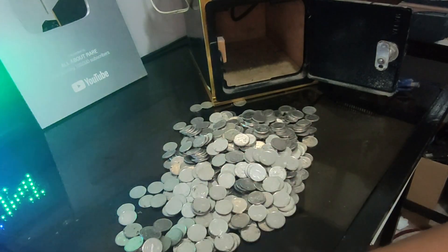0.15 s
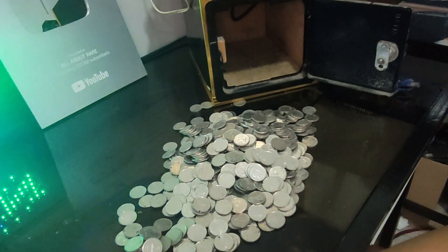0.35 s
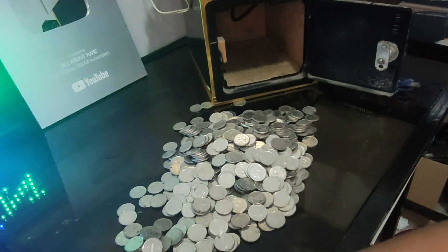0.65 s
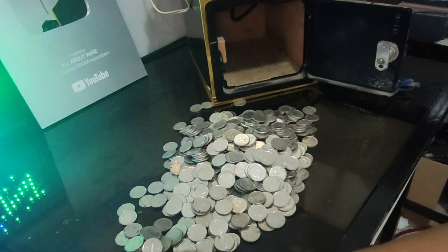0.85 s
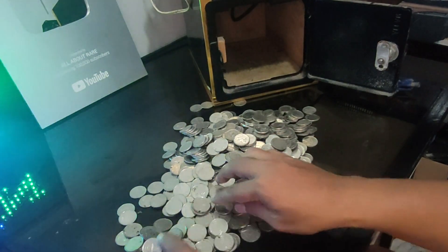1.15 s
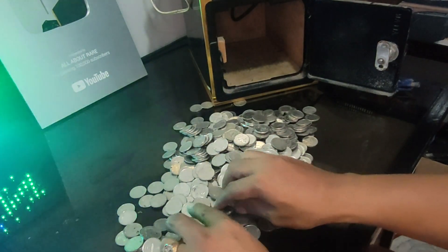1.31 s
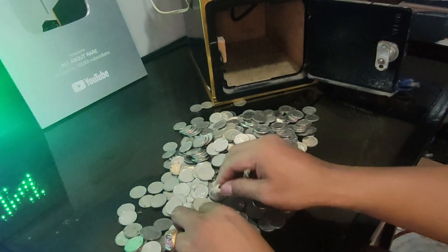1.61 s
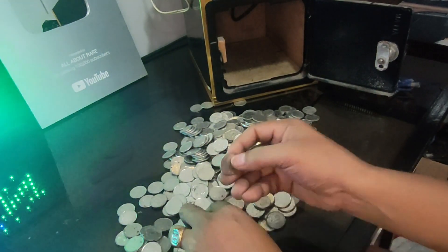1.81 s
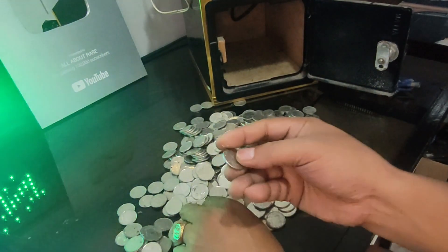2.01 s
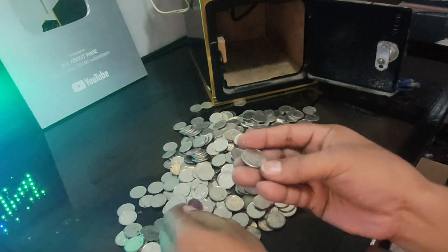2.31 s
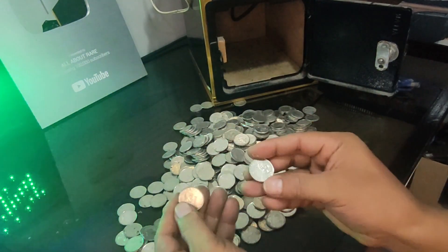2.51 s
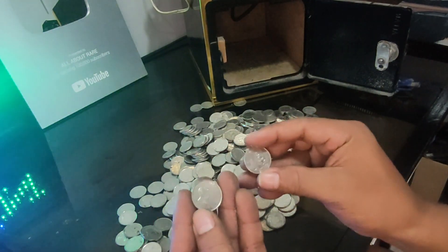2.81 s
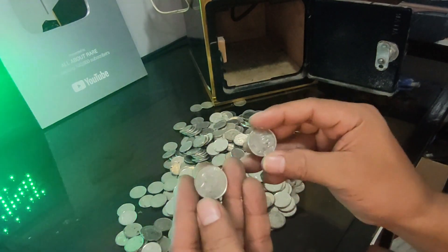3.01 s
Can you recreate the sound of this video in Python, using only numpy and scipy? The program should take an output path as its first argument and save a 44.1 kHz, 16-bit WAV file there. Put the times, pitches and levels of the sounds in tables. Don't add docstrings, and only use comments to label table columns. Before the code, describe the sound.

Coins are stirred on a hard table, close up in a small live room over a soft fan hum. A sharp knock comes at 0.37 s, a lighter one at 0.65, then a hard clack with ringing around 0.92. From 1.4 s scrapes and clinks grow busier, with strong knocks near 1.95 and faint thuds. Small damped pings tap at 2.3-2.5 s; low draught buffets the right from 2.85.

```python
import sys
import numpy as np
from scipy import signal
from scipy.fft import rfft, irfft
from scipy.io import wavfile
from scipy.ndimage import uniform_filter1d

SR = 44100
rng = np.random.default_rng(int(sys.argv[2]) if len(sys.argv) > 2 else 0)


def store_wav(level_fs):
    pcm = np.round(np.clip(np.atleast_2d(level_fs), -1, 1) * 32767)
    wavfile.write(sys.argv[1], SR, pcm.T.astype(np.int16))


def nominal_scale(level):
    x = np.asarray(level, float) / 20
    return 10 ** x


N = 138915
T = np.arange(N) / SR
F = np.maximum(np.fft.rfftfreq(N, 1 / SR), 1)

# frequency in Hz, level in dB per Hz.
HEAP_COLOUR = [(80, -31), (350, -8), (800, -3), (2000, 1.5), (4200, -1), (6000, -3.5), (7500, -11.5),
               (10000, -16), (15000, -22)]


def curve(table):
    table = np.array(table, float)
    return np.interp(np.log(F), np.log(table[:, 0]), table[:, 1])


def humps(table):
    return sum(db * np.exp(-.5 * ((F - hz) / (width / 2)) ** 2) for hz, width, db in table)


def colour(x, gain):
    return irfft(rfft(x, N) * gain, N)


def unit(x):
    return x / np.sqrt(np.mean(x ** 2))


def decay(t, t60):
    return np.exp(-np.log(1000) * t / t60)


def ring(hz, t60):
    t = T[:int(.4 * SR)]
    return np.sin(2 * np.pi * hz * t) * decay(t, t60)


def soft_start(tone, rise_s):
    return tone * np.minimum(T[:len(tone)] / rise_s, 1)


def add(out, start_s, x, pan_db):
    i = int(start_s * SR)
    x = x[..., :N - i]
    out[:, i:i + x.shape[-1]] += x * nominal_scale(np.array([[pan_db], [-pan_db]]) / 2)


def pair(n):
    shared = 0.36
    a = rng.standard_normal((3, n))
    return np.sqrt(shared) * a[0] + np.sqrt(1 - shared) * a[1:]


def fan():
    # frequency in Hz, level in dB per Hz.
    fan_colour = [(24, -52), (40, -28), (155, -3.5), (631, -6), (712, -7.5), (1080, -0.5), (1340, -4.5),
                  (4070, -11), (13000, -54.5)]
    # frequency in Hz, width in Hz, lift in dB.
    fan_hums = [(154.5, 29, 6), (224, 56, 6), (1010, 40, 1.5)]
    # frequency in Hz, likeness from 0 to 1.
    port_likeness = [(60, 0.57), (130, 1), (300, 0.97), (640, 0.68), (1400, 0.11), (15000, .05)]
    level_db = -38.5
    like = curve(port_likeness)
    gain = nominal_scale(curve(fan_colour) + humps(fan_hums))
    mid = colour(rng.standard_normal(N), gain * np.sqrt(1 + like))
    side = colour(rng.standard_normal(N), gain * np.sqrt(1 - like))
    flutter_db = 0.87 * unit(uniform_filter1d(rng.standard_normal((2, N)), 4000))
    return nominal_scale(level_db) * unit(np.array([mid + side, mid - side]) * nominal_scale(flutter_db))


def draught():
    # start in seconds, peak in dB, pitch in Hz, length in seconds.
    puffs = [(0.114, -31.5, 35, 0.034), (0.237, -36.5, 35, 0.076), (0.378, -36, 40, .06),
             (2.703, -36.5, 45, 0.04), (2.751, -35, 45, 0.035), (2.839, -21.5, 70, 0.024),
             (2.867, -19.5, 80, 0.047), (2.9, -9.5, 90.6, 0.039), (2.928, -9, 65.3, 0.033),
             (2.964, -9, 187, 0.04), (2.972, -14, 70.4, 0.044), (3.021, -10, 79, 0.022),
             (3.039, -10, 188, 0.021), (3.043, -11.5, 55, 0.033), (3.06, -26, 35, .08),
             (2.906, -19.5, 300, 0.016), (3.025, -24, 350, .012)]
    sharp_db, leak_db = -20, -48
    rumble_hz, rumble_db = 35, -60.5
    out = np.zeros((2, N))
    t = T[:8192]
    for start_s, db, hz, length_s in puffs:
        noise = rng.standard_normal(8192)
        slow = unit(colour(noise, 1 / (1 + (1.6 * (F / hz - hz / F)) ** 2))[:8192])
        edge = unit(colour(noise, (F / hz) / (1 + (F / (3 * hz)) ** 4))[:8192])
        swell = np.sin(np.pi * np.clip(t / length_s, 0, 1)) ** 2
        puff = (slow + nominal_scale(sharp_db) * edge) * swell
        add(out, start_s, nominal_scale(db) * puff / np.abs(puff).max(), 0)
    rumble = unit(colour(rng.standard_normal(N), 1 / (1 + (F / rumble_hz) ** 4)))
    out = out + nominal_scale(rumble_db) * rumble
    return out * np.array([[nominal_scale(leak_db)], [1]])


def coin():
    # mode frequency in Hz, level in dB, t60 in seconds.
    coin_modes = [(6140, -3, .06), (6940, -11, 0.098), (9450, -18, 0.045), (10500, -9, .04),
                  (12900, -18, .08), (13400, 1, 0.086), (13400, -10, 0.12), (13700, -5, 0.065),
                  (14200, -16, .05)]
    body = 0
    for (hz, db, t60), (strike, tuning) in zip(coin_modes, rng.standard_normal((len(coin_modes), 2))):
        body = body + nominal_scale(db + 2.5 * strike) * ring(hz * (1 + 0.0044 * tuning), t60)
    return body


def slides():
    # start in seconds, length in seconds, level in dB, brightness in dB per octave, high ring in dB.
    slide_events = [(0.363, 0.076, -35, 0.5, -38), (.79, 0.17, -40.5, -0.5, -5), (0.926, 0.11, -41, 2, 1),
                    (0.979, 0.055, -36.5, -2, -3), (1.362, .1, -32, -0.5, -7), (1.471, 0.063, -36, -1, -17),
                    (1.57, 0.087, -29, -1, -6), (1.761, 0.087, -36.5, 1, -10), (1.798, 0.026, -33, -6, -10),
                    (2.1, 0.073, -40, -6, -15), (1.828, 0.081, -30.5, 1.5, -24),
                    (1.95, 0.091, -33.5, -0.5, -26), (2.03, 0.083, -33, 0.5, -19),
                    (2.208, 0.09, -30.5, 0.5, -14), (2.309, 0.15, -35, -0.5, 1),
                    (2.456, 0.091, -33, 3.5, -8), (2.571, 0.12, -34, 1, -4), (2.679, 0.056, -35.5, -2, -27)]
    rise = 0.24
    grains_per_s, grain_spread_db, grain_top_db, patchy_db = 4000, 5, 4, 3
    ragged_db, ring_level_db = 5, -18
    lead = 256
    out = np.zeros((2, N))
    for start_s, length_s, db, tilt_db, ring_db in slide_events:
        chance, size = rng.random((2, 8192))
        x = T[:8192] / length_s
        swell = np.clip(np.minimum(x / rise, (1 - x) / (1 - rise)), 0, 1)
        patches = unit(uniform_filter1d(rng.standard_normal(8192), size=200))
        swell = swell * nominal_scale(patchy_db * patches)
        size_db = np.minimum(-grain_spread_db * np.log(size + 1e-9), grain_top_db)
        clicks = (chance < grains_per_s / SR) * np.tanh(pair(8192))
        grains = unit(clicks * nominal_scale(size_db)) * swell
        ragged = np.interp(F / 200, np.arange(128), rng.standard_normal(128)) * np.clip(F / 4000, 0, 1)
        tilt = tilt_db * np.log2(np.maximum(F, 300) / 3000)
        gain = nominal_scale(curve(HEAP_COLOUR) + tilt + ragged_db * ragged)
        scrape = colour(grains, gain / np.sqrt(np.mean(gain ** 2)))
        scrape = np.roll(scrape, lead, axis=1)[:, :16384]
        body = coin()
        rung = signal.fftconvolve(grains, body[None] / np.sqrt(np.sum(body ** 2)))
        add(out, start_s - lead / SR, nominal_scale(db) * scrape, 1)
        add(out, start_s, nominal_scale(db + ring_db + ring_level_db) * rung, 2)
    return out


def knocks():
    # start in seconds, peak in dB, pitch in Hz, t60 in seconds, left over right in dB.
    knock_events = [(.3648, -10.5, 4170, 0.013, 1), (0.3662, -16.5, 2930, 0.026, 3.5),
                    (0.3676, -20, 1300, .015, 2), (0.3703, -22.5, 2040, 0.018, 3),
                    (.3785, -24.5, 3800, 0.014, 5), (0.6552, -22, 4460, 0.015, 5),
                    (0.805, -26, 3400, 0.023, 9), (0.8599, -28, 2760, .02, 2),
                    (.9230, -8.5, 4770, 0.016, -1), (0.9257, -21.5, 990, .015, 2),
                    (.934, -22.5, 5350, .04, 0), (.95, -26, 4400, 0.031, 6), (0.9774, -19, 2820, 0.021, -1),
                    (.9785, -20, 5050, .02, -2), (.9790, -28.5, 9400, 0.012, 6),
                    (1.012, -20, 1970, 0.021, -4), (1.376, -29, 3620, 0.027, 7), (1.392, -23, 4000, .03, 3),
                    (1.5185, -27.5, 4160, 0.019, 5), (1.5836, -19, 2040, 0.028, 6),
                    (1.587, -22.5, 4000, .02, 7), (1.7693, -26.5, 4070, .03, -5),
                    (1.836, -21, 2360, 0.033, 8), (1.853, -23, 5530, .015, 1),
                    (1.955, -11, 4600, 0.0046, -1), (1.9579, -9.5, 3920, 0.0064, 6),
                    (2.025, -12, 2460, 0.021, 4), (2.0257, -17.5, 4480, 0.029, -1),
                    (2.030, -20.5, 2240, .02, 2), (2.2110, -19, 2730, 0.028, -1),
                    (2.2123, -19.5, 5500, 0.015, 10.5), (2.2473, -29, 4280, 0.024, -1),
                    (2.4885, -13, 2860, 0.01, 7), (2.4900, -17.5, 1990, 0.039, 9.5),
                    (2.6927, -24.5, 3700, .025, 8.5)]
    rise_s, width, tick_db = 0.00035, 0.32, -8.5
    out = np.zeros((2, N))
    t = T[:4096]
    f = np.fft.rfftfreq(4096, 1 / SR) + 1
    bins = (f / SR * N).astype(int).clip(0, len(F) - 1)
    tick = nominal_scale(curve(HEAP_COLOUR) + tick_db)[bins]
    for start_s, db, hz, t60, pan_db in knock_events:
        gain = 1 / (1 + ((f / hz - hz / f) / width) ** 2) + tick
        burst = irfft(rfft(pair(4096)) * gain)
        burst = burst * (1 - np.exp(-t / rise_s)) * decay(t, t60)
        add(out, start_s, nominal_scale(db) * burst / np.abs(burst.mean(axis=0)).max(), pan_db)
    return out


def clinks():
    # start in seconds, peak in dB, pitch in Hz, t60 in seconds.
    clink_events = [(0.3661, -53, 13000, 0.064), (0.6549, -54, 14300, 0.07), (0.8066, -45, 13800, 0.07),
                    (0.843, -39.5, 13150, 0.07), (0.8599, -43, 13600, 0.07), (0.9228, -31, 13400, 0.07),
                    (0.9782, -29, 14200, 0.07), (0.986, -31, 13300, 0.083), (1.3748, -44, 13100, 0.07),
                    (1.49, -51, 13400, 0.07), (1.5185, -41, 12900, 0.07), (1.5725, -36, 12900, 0.07),
                    (1.7699, -51.5, 13500, 0.07), (1.8204, -34, 12970, 0.07), (1.8357, -25.5, 12920, 0.06),
                    (1.954, -30, 13900, 0.07), (2.0274, -31.5, 13120, 0.07), (2.1919, -31.5, 13170, 0.033),
                    (2.214, -31.5, 13200, 0.066), (2.3486, -48, 13700, 0.07), (2.376, -38, 13300, 0.088),
                    (2.4189, -36.5, 12800, 0.07), (2.4777, -30, 12900, 0.055), (2.5895, -44, 14000, 0.09),
                    (2.605, -38, 13500, 0.07), (2.6938, -43, 13400, 0.086)]
    spread, lag_s = .018, .000024
    out = np.zeros((2, N))
    for start_s, db, hz, t60 in clink_events:
        neighbours = sum(ring(hz * (1 + spread * c), t60 * 0.61) for c in rng.standard_normal(3))
        tone = soft_start(ring(hz, t60) + nominal_scale(-2.5) * neighbours, 0.0011)
        late = np.roll(tone, int(lag_s * SR))
        add(out, start_s, nominal_scale(db) * np.array([tone, late]), 1.5)
    return out


def thuds():
    # start in seconds, peak in dB, pitch in Hz.
    thud_events = [
        (.9235, -31.5, 397),
        (1.40, -35, 380),
        (1.81, -33, 486),
        (1.86, -33.5, 416),
        (2.04, -31.5, 740),
        (2.09, -30, 498),
        (2.14, -34.5, 700),
        (2.22, -35.5, 398),
        (2.489, -31, 399),
        (2.63, -34.5, 397),
    ]
    out = np.zeros((2, N))
    for start_s, db, hz in thud_events:
        add(out, start_s, nominal_scale(db) * soft_start(ring(hz, 0.05), 0.0021), 0)
    return out


def pings():
    # start in seconds, peak in dB.
    ping_events = [
        (2.3146, -28.5),
        (2.4044, -31),
        (2.42, -21.5),
        (2.4476, -21.5),
        (2.4847, -19.5),
        (2.493, -18.5),
    ]
    hz, t60, pan_db = 4047, .045, 6
    out = np.zeros((2, N))
    for start_s, db in ping_events:
        add(out, start_s, nominal_scale(db) * soft_start(ring(hz, t60), 0.0019), pan_db)
    return out


def room(close):
    # frequency in Hz, t60 in seconds.
    room_decay = [(300, 0.98), (2000, 0.86), (6000, 0.65), (14000, 0.32)]
    level_db, gap_s = 1, 0.0016
    t = T[:SR // 2]
    tail = 0
    for hz, t60 in room_decay:
        share = curve([(f, float(f == hz)) for f, _ in room_decay])
        band = colour(rng.standard_normal((2, N)), np.sqrt(share))[:, :len(t)]
        tail = tail + band * decay(t, t60)
    tail = tail * np.minimum(t / gap_s, 1)
    tail = tail / np.sqrt(np.mean(np.sum(tail ** 2, axis=1)))
    return nominal_scale(level_db) * signal.fftconvolve(close.mean(axis=0)[None], tail)[:, :N]


def scene():
    coins = knocks() + clinks() + thuds() + slides()
    ping = pings()
    ping_room_db = -7
    return coins + ping + room(coins + nominal_scale(ping_room_db) * ping) + fan() + draught()


def gate(x):
    from_hz, threshold_db, full_depth_db = 3400, -2.5, -12.5
    f, _, z = signal.stft(x, SR, nperseg=512, noverlap=384)
    power = uniform_filter1d(np.sum(np.abs(z) ** 2, axis=0), size=9, axis=1)
    around = uniform_filter1d(power, size=15, axis=0)
    weak = power < nominal_scale(2 * threshold_db) * around
    treble = np.clip(f / from_hz - .5, 0, 1)[:, None]
    depth_db = full_depth_db * treble * uniform_filter1d(1. * weak, size=3, axis=1)
    return signal.istft(z * nominal_scale(depth_db), SR, nperseg=512, noverlap=384)[1][:, :N]


def roll_off(x):
    return signal.sosfilt(signal.butter(12, 16490, fs=SR, output="sos"), x)


def record(dry):
    # frequency in Hz, width in Hz, depth in dB.
    port_dips = [(8210, 490, -5.5), (12160, 780, -13.5)]
    heard = colour(dry, nominal_scale(humps(port_dips)))
    closed_top = signal.ellip(8, .2, 60, 15600, fs=SR, output="sos")
    mix = gate(signal.sosfilt(closed_top, heard))
    return roll_off(mix)


dry = scene()
out = record(dry)
store_wav(out)
```